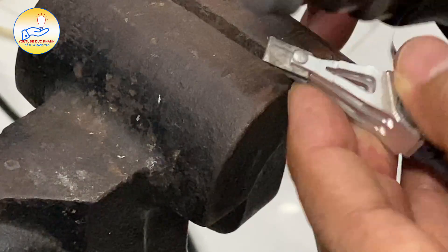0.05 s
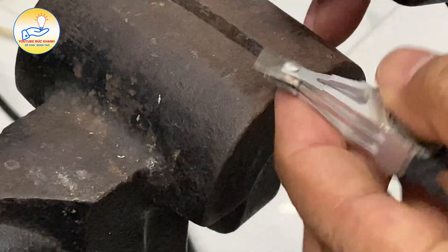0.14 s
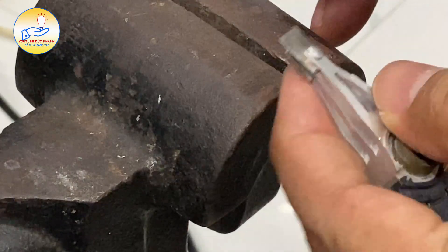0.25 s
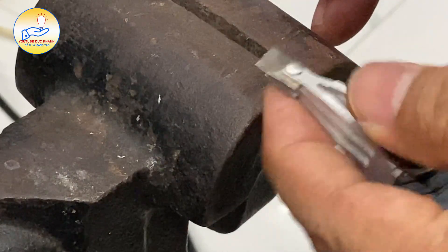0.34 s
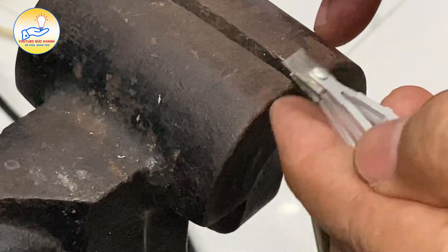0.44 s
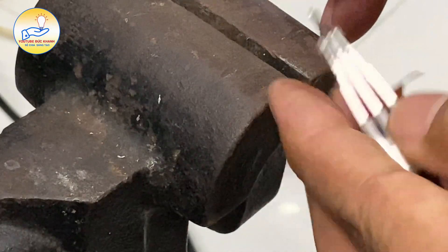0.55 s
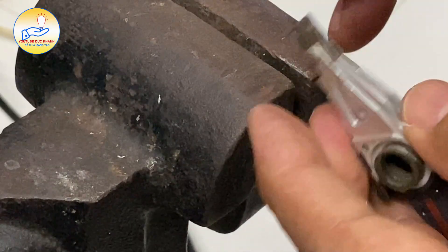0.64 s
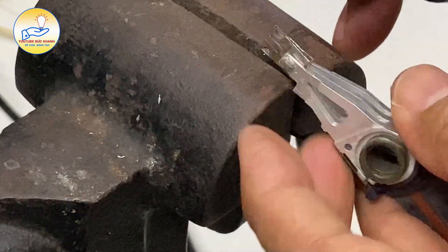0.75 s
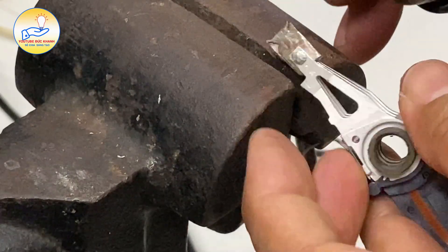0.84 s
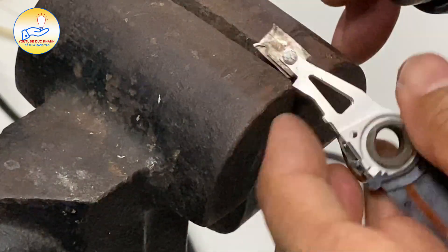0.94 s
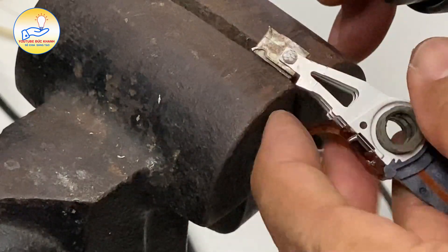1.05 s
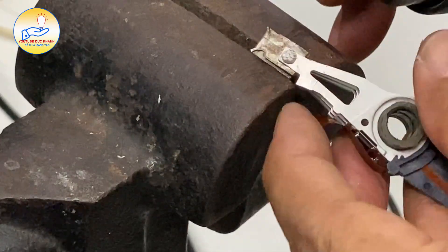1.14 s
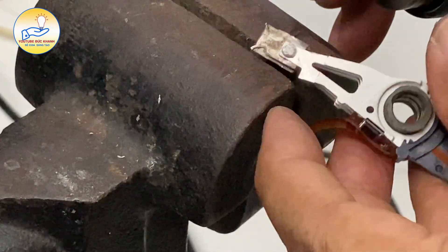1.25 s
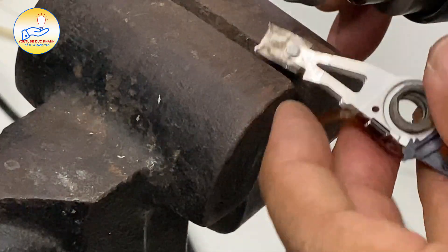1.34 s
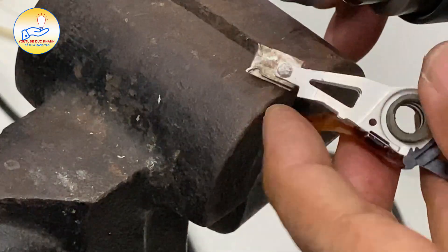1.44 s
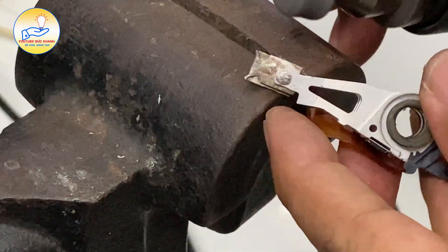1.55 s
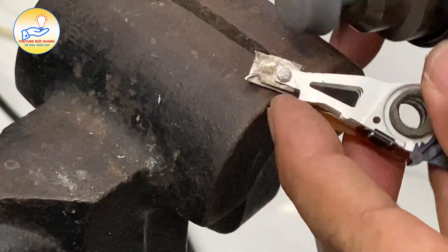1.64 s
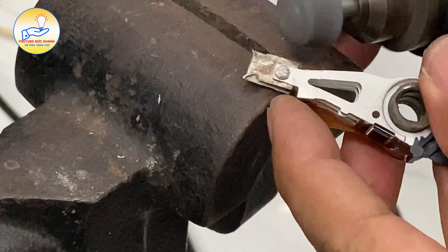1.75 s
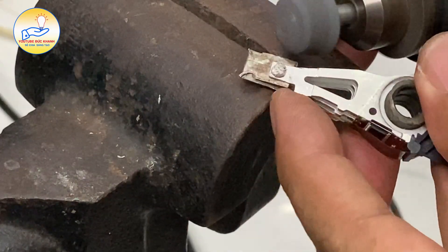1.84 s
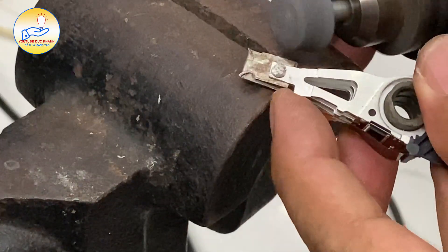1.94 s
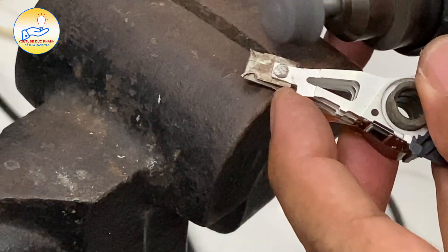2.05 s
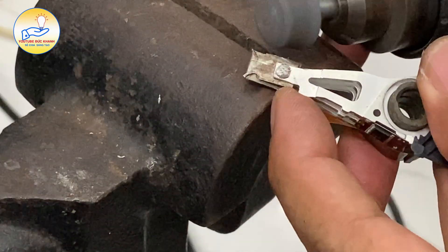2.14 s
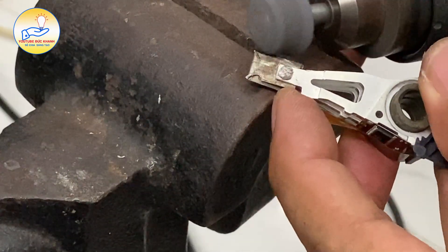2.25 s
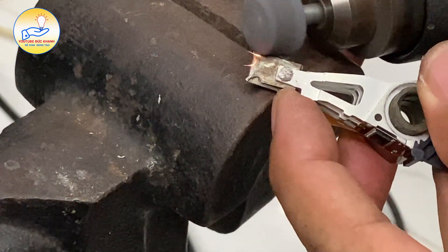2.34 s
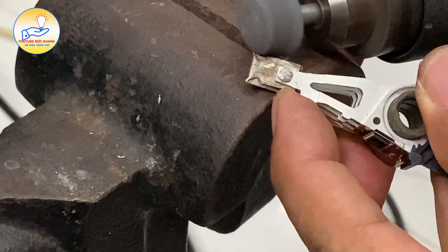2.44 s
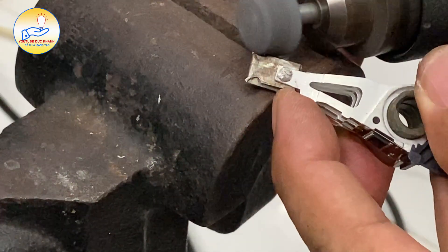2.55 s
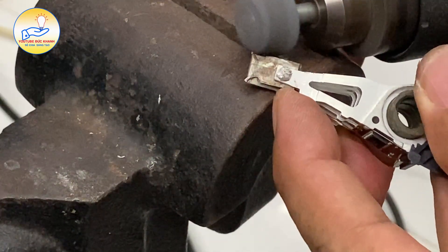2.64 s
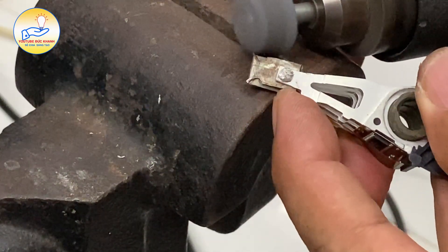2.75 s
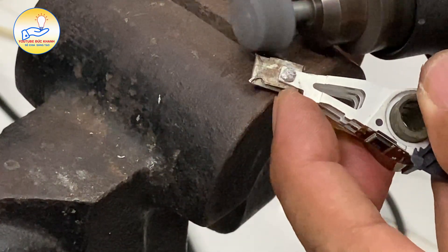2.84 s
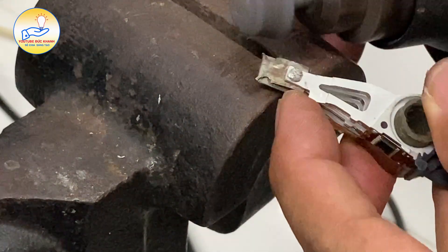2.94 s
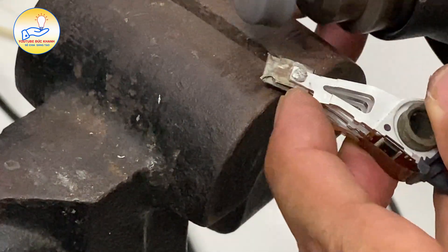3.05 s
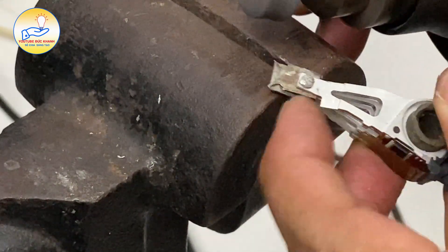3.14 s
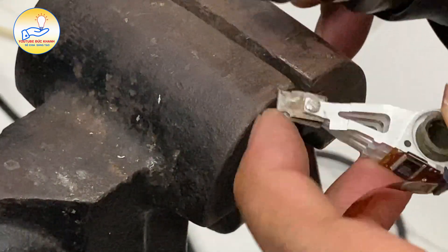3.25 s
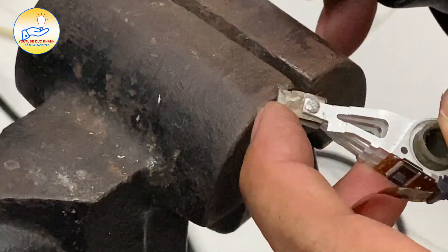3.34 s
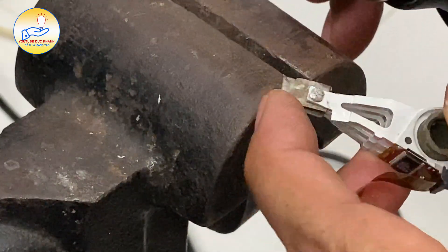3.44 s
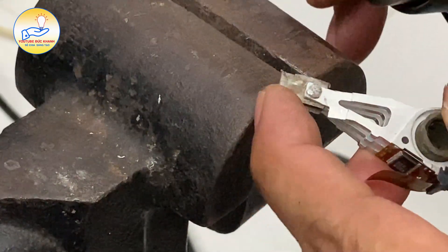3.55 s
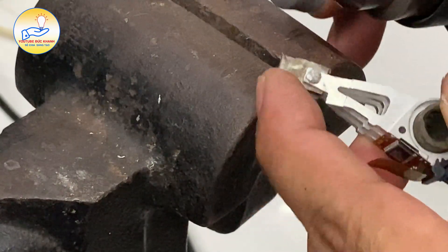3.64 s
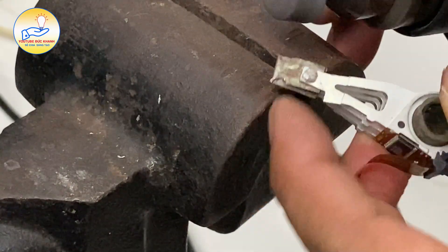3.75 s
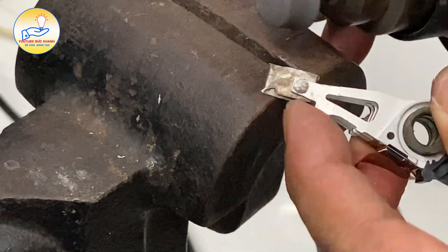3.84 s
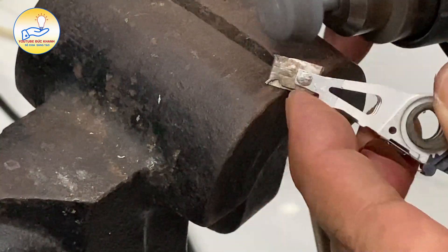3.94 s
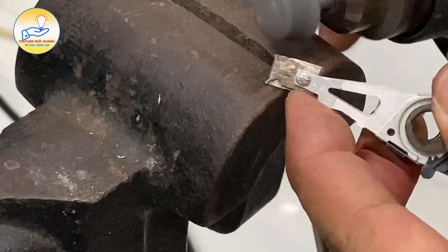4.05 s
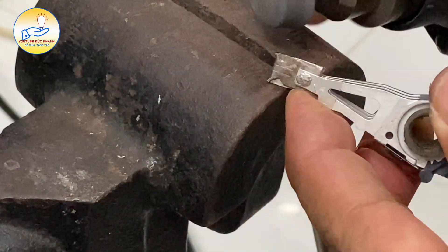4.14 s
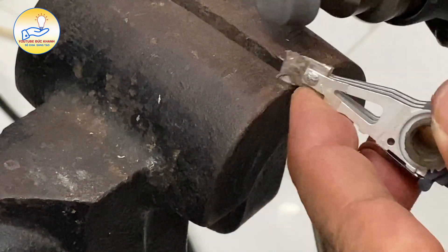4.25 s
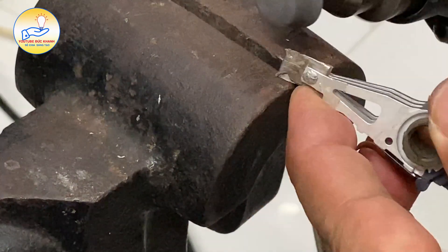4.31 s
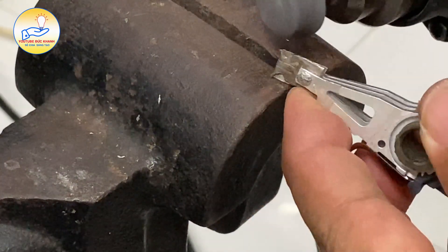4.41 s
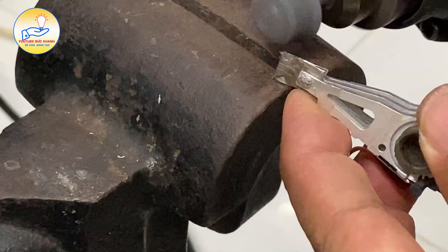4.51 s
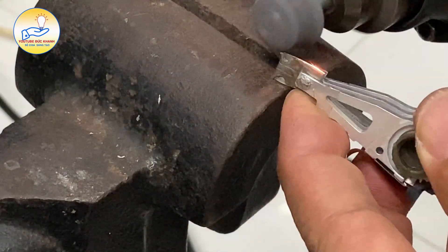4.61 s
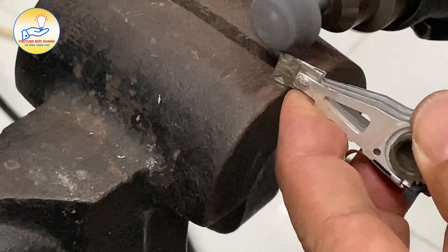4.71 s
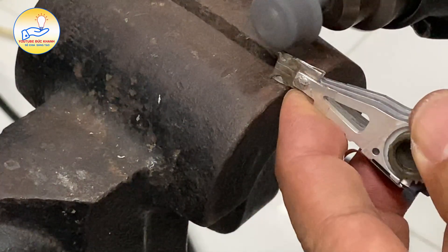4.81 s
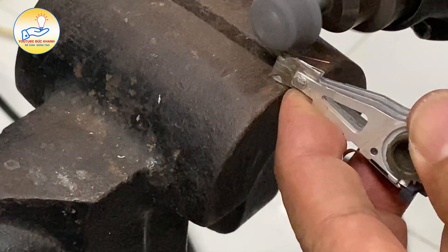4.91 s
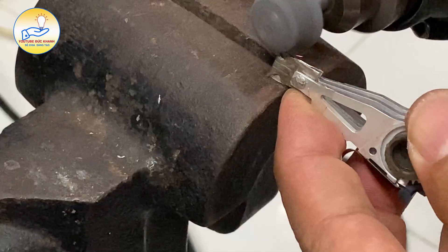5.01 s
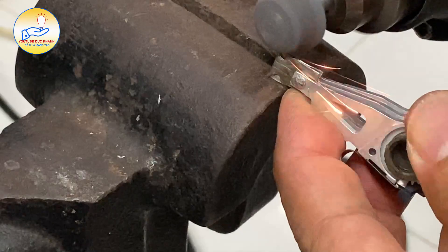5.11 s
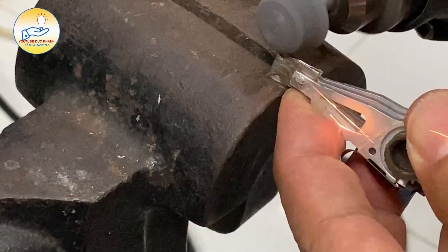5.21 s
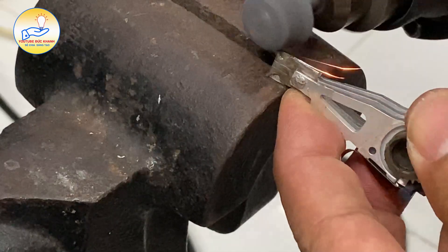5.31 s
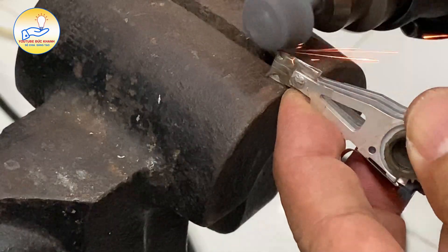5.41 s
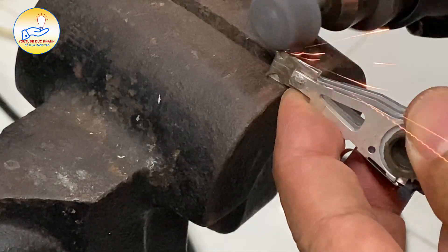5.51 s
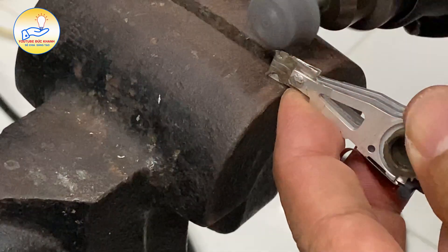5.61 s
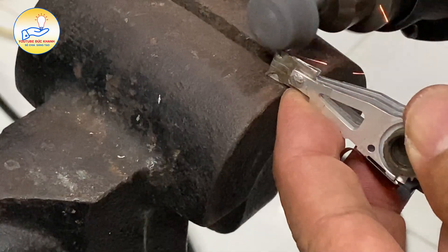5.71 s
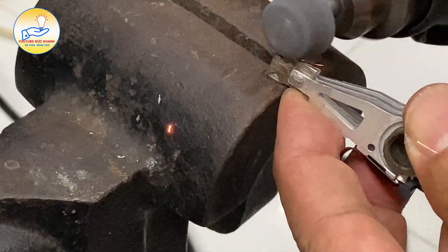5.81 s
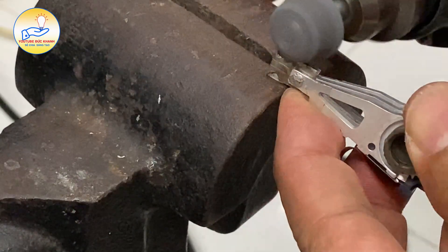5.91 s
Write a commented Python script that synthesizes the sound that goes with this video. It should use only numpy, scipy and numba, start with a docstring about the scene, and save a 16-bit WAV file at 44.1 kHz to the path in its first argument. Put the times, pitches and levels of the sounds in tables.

```python
"""A short rattling touch of metal opens over the whine and rushing air of a small rotary grinder, heard close up.
It spins at about 19000 rpm over a vise; its motor whines with a mains ripple and its fan blows through the vents.
Touch by touch the stone meets a thin steel part: the same grit strikes once a turn, and the part sings or
rattles. Each touch brakes the shaft, which slowly winds up again. Soft thuds come from hands on the vise."""
import sys
import numpy as np
from scipy import signal
from scipy.fft import rfft, irfft
from scipy.io import wavfile
from scipy.ndimage import uniform_filter1d, map_coordinates
from numba import njit

SR = 44100
rng = np.random.default_rng(int(sys.argv[2]) if len(sys.argv) > 2 else 0)


def store_wav(level_fs):
    """Save 16-bit WAV to argv[1]."""
    pcm = np.round(np.clip(np.atleast_2d(level_fs), -1, 1) * 32767)
    wavfile.write(sys.argv[1], SR, pcm.T.astype(np.int16))


N = 263277
TIME = np.arange(N) / SR  # seconds

# base loudness of the grinder as the hand moves it: time_s, level_db [dB]
TOOL_LEVEL = [(0, -38.5), (.3, -39), (.63, -36.5), (2.69, -35), (2.78, -38), (3.5, -37), (4.6, -35.5),
              (5.52, -36), (5.59, -39.5), (5.97, -38)]
# every touch of the stone on the part: start_s, length_s, attack_s, contact (kind of touch, a word),
# ring_db, rasp_db [dB, before the trim of its kind], ring_pitch_hz, braking [Hz per s]
TOUCHES = [(0, 0.022, 0.0018, "loose", -17.5, -25.5, 3620, 11.5),
           (2.25, 0.015, .01, "graze", -21.5, -27.5, 3576, 17),
           (2.333, 0.05, 0.02, "graze", -15.5, -26, 3604, 17.5),
           (2.382, 0.092, 0.073, "edge", -20, -24.5, 3510, 12.6),
           (2.47, 0.093, 0.018, "edge", -24.5, -26.5, 3600, 12.3),
           (2.565, 0.11, 0.032, "edge", -21.5, -25.5, 3660, 19.4),
           (2.679, 0.062, 0.028, "edge", -18.5, -24, 3736, 13.2),
           (2.736, 0.089, 0.023, "edge", -29, -29, 3763, 7.7),
           (4.639, 0.014, 0.0088, "flat", -24.5, -26, 3553, 30),
           (4.693, 0.057, 0.034, "flat", -27.5, -34, 3490, 18),
           (4.911, .014, 0.0089, "flat", -26, -27.5, 3493, 56),
           (4.944, 0.054, .025, "flat", -23, -32, 3500, 14), (5, 0.12, 0.021, "flat", -23, -31, 3480, 14.2),
           (5.121, 0.12, 0.067, "flat", -17, -27, 3483, 25.2),
           (5.25, 0.049, 0.027, "flat", -20.5, -29, 3490, 41),
           (5.299, 0.1, 0.025, "flat", -23, -33, 3424, 15.5),
           (5.388, .11, 0.1, "digging", -22, -31, 3414, 18.8),
           (5.495, 0.046, 0.026, "pressed", -13.5, -33.5, 3700, 95),
           (5.563, 0.017, 0.0099, "pressed", -15, -35, 3700, 60),
           (5.585, 0.031, 0.015, "pressed", -19, -31.5, 3770, 25),
           (5.671, .072, .05, "pressed", -17.5, -31, 3690, 16),
           (5.745, 0.1, 0.061, "pressed", -16, -35.5, 3670, 20),
           (5.84, 0.024, 0.026, "pressed", -14, -27.5, 3610, 62),
           (5.866, 0.038, 0.01, "pressed", -18.5, -31, 3670, 46),
           (5.902, 0.03, 0.017, "pressed", -16.5, -34.5, 3590, 34)]
# how the ring of a touch fades: sag [dB per s] while it lasts, release_s afterwards
RING_SHAPE = (79, 0.024)


def undb(db):
    """Decibels to gain."""
    return 10 ** (np.asarray(db) / 20)


def curves(table):
    """Each column of a table, joined by straight lines in time."""
    seconds, *columns = np.transpose(table)
    return [np.interp(TIME, seconds, column) for column in columns]


def unit(x):
    """Scale to rms (average strength) 1."""
    return x / np.sqrt(np.mean(x ** 2))


def steady(x, size=700):
    """Scale to a running rms of 1 over a window of this many samples."""
    power = np.abs(uniform_filter1d(x ** 2, size))
    return x / np.sqrt(power + 1e-18)


def walk(rate):
    """Smooth random drift with a spread near 1, through this many random points per second."""
    knots = rng.standard_normal(2048)
    coarse_time = TIME[::64]
    drift = map_coordinates(knots, [coarse_time * rate], order=2, mode="mirror")
    return np.interp(TIME, coarse_time, drift)


def colour(x, points, lifts=(), size=2048):
    """Filter without pre-echo, from (Hz, dB) points and resonances (Hz, width Hz, dB of lift or dip)."""
    f = np.arange(size // 2 + 1) * SR / size
    hz, db = np.transpose(points)
    gain_db = np.interp(np.log(f + 1), np.log(hz), db)
    for centre, width, lift in lifts:
        gain_db = gain_db + lift * np.exp(-2 * ((f - centre) / width) ** 2)
    # folding the cepstrum makes the filter answer as early as it can (minimum phase)
    cepstrum = irfft(np.log(undb(gain_db)))[:size // 2]
    cepstrum[1:] *= 2
    response = irfft(np.exp(rfft(cepstrum, size)))
    return signal.fftconvolve(x, response)[:N]


@njit
def resonate(x, hz, width):
    """Band-pass filter with a moving centre, gain 1 at its peak."""
    y, band, low = np.empty(len(x)), 0., 0.
    for i in range(len(x)):
        g = np.tan(np.pi * hz[i] / SR)
        damping = width / hz[i]
        v = (band + g * (x[i] - low)) / (1 + g * (g + damping))
        band = 2 * v - band
        low = low + 2 * g * v
        y[i] = damping * v
    return y


def mode(x, hz, width):
    """One way the part rings: the band-pass used twice for steep sides, then held at rms 1."""
    centre = hz * np.ones(N)
    once = resonate(x, centre, 1. * width)
    return steady(resonate(once, centre, 1. * width))


def clicks(times, sizes, order=4):
    """Clicks placed between the samples, on a grid this many times finer."""
    places = np.rint(np.clip(times, 0, TIME[-1]) * SR * order).astype(int)
    fine = np.bincount(places.ravel(), sizes.ravel(), N * order)
    return signal.resample_poly(fine, 1, order)


def envelope(start, length, attack, sag_db, release, damping=1):
    """Rounded attack, sagging hold and release of one touch; more damping shortens the release."""
    age = TIME - start
    rise = np.sin(np.pi / 2 * np.clip(age / attack, 0, 1))
    sag = undb(-sag_db * np.clip(age, 0, length))
    fall = np.exp(-np.maximum(age - length, 0) * damping / release)
    return rise * sag * fall


def bumps(low_hz=55, high_hz=100):
    """Hands bump the vise softly: dull thuds through the bench, made of swells of low noise."""
    # the thuds: centre_s, level_db [dB], length_s
    thuds = [(1.899, -40.5, 0.035), (2.011, -49, 0.036), (2.3, -52, 0.046), (2.46, -49, 0.013),
             (5.157, -51, 0.04)]
    band = signal.butter(2, (low_hz, high_hz), "band", fs=SR, output="sos")
    rumble = signal.sosfilt(band, rng.standard_normal(N))
    swells = sum(undb(db) * np.exp(-((TIME - s) / length) ** 2) for s, db, length in thuds)
    return steady(rumble, size=2500) * swells


def fan(turns, air_db=4.5, flutter=0.078):
    """Air rushes through the housing as coloured noise, pulsing a little with each turn."""
    # tone of the rushing air: pitch_hz, level_db [dB, relative]
    air_colour = [(20, -60), (40, -21), (65, -22.5), (300, -18.5), (500, -20), (800, -15), (2000, -10),
                  (2800, -11), (4400, -10.5), (5800, -13), (8000, -15), (12000, -16.5), (14000, -17.5),
                  (15500, -23)]
    # resonances of the housing: pitch_hz, width_hz, lift_db [dB, a dip if negative]
    housing = [(628, 34, 6), (966, 161, 13), (1504, 440, 9), (3910, 850, 4.5), (2690, 94, -3.5)]
    pulse = 1 + flutter * np.cos(2 * np.pi * turns)
    rush = rng.standard_normal(N) * pulse * undb(.5 * walk(22.02))
    return unit(colour(rush, air_colour, housing)) * undb(curves(TOOL_LEVEL)[0] + air_db)


# the shaft speeds up from the start towards its free speed, and recovers at the same rate after each touch
START_HZ, FREE_HZ, RECOVERY_S = 299.2, 322.32, 1.16


def shaft_speed():
    """Shaft turns per second: each touch brakes it and the motor pulls it back towards its free speed."""
    braking = 0
    for start, length, *_, brake in TOUCHES:
        # 1 during the touch, 0 outside
        touching = np.clip(np.minimum(TIME - start, start + length - TIME) * SR, 0, 1)
        braking = braking + brake * touching
    lost_hz = signal.lfilter([1 / SR], [1, -np.exp(-1 / (RECOVERY_S * SR))], braking)
    run_up_hz = FREE_HZ - (FREE_HZ - START_HZ) * np.exp(-TIME / RECOVERY_S)
    return run_up_hz - lost_hz


def motor(turns, speed_hz, ripple=0.42, second_ripple=0.23, sway=0.43, second_sway=0.37,
          wobble_db=-14.0, overtone_waver_db=1.0, count=12):
    """The armature slots whine and throb with the rectified mains, over a comb of shaft overtones."""
    # the whine beams, so it changes as the tool turns: time_s, level_db [dB over the tool level],
    # sway_lag [rad, pitch sway against throb], top_lift_db [dB, for its top overtones]
    whine_course = [(0, 8, -.4, 5), (.35, 9, 0, -1), (.7, 7.5, 0.98, 1), (1.2, 8.5, .85, 6),
                    (1.65, 8, .55, -1), (2.15, 9, -0.38, 0), (3.15, 10.5, .2, 2), (3.5, 5.5, .75, -2),
                    (4, 8, 0.24, 1), (4.45, 7.5, -.9, -7), (5.97, 6.5, 0.03, 0)]
    # shaft overtones: order [multiple of the speed], level_db [dB, relative]
    shaft_orders = [(1, -19.5), (3, -16.5), (5, -25), (9, -22), (15, -16.5), (16, -13.5), (20, -16),
                    (22, -24), (24, -17), (27, -25), (28, -14.5), (29, -15.5), (30, -27), (32, -20),
                    (34, -25), (35, -20), (36, -13), (37, -17.5), (40, -31), (42, -24), (46, -31),
                    (48, -19)]
    # the motor case rings when an overtone sweeps through it: pitch_hz, width_hz, lift_db [dB]
    case_resonances = [(4875, 55, 5.5), (7710, 360, 9.5), (13000, 35, 7)]
    tool_db = curves(TOOL_LEVEL)[0]
    whine_db, sway_lag, top_db = curves(whine_course)
    # 7.5 dB over the tool level at free speed, weaker by 0.2 dB for each Hz the shaft has slowed
    overtone_db = tool_db + 7.5 - 0.2 * (FREE_HZ - speed_hz)

    mains = 2 * np.pi * 100 * TIME  # rectified mains pulses at 100 Hz
    throb = 1 + ripple * np.cos(mains) + second_ripple * np.cos(2 * mains)
    angle = 2 * np.pi * turns
    # the pulsing torque also sways the pitch
    lead = sway * np.cos(mains + sway_lag) - second_sway * np.cos(2 * mains - 0.25)
    # the rotor's wobble adds a line one order below the slots
    wobble = undb(wobble_db) * np.sin((count - 1) * angle)
    slots = np.sin(count * angle + lead) + wobble

    overtones = 0
    for multiple, db in shaft_orders:
        order = np.rint(multiple)
        drift = rng.uniform(0, 2 * np.pi) + 0.04 * walk(24)
        lift_db = sum(lift / (1 + ((order * speed_hz - hz) / width) ** 4)
                      for hz, width, lift in case_resonances)
        # short waves fade in and out as the hand moves; the slots' top overtones beam with the whine
        fade_db = overtone_waver_db * min(order / 20, 1) * walk(2.65)
        if order % count == 0 and order > 2 * count:
            fade_db = top_db
        overtones = overtones + undb(db + lift_db + fade_db) * np.sin(order * angle + drift)
    return undb(tool_db + whine_db) * throb * slots + undb(overtone_db) * overtones


def rattle():
    """The part bounces off the stone and rings freely; noise plays the irregular bounces."""
    # the bounces: start_s, length_s, attack_s, level_db [dB]
    bounce_times = [(.008, .014, .01, -25), (4.638, .018, 0.011, -27), (4.913, 0.019, .015, -19),
                    (5.108, 0.087, 0.027, -22), (5.622, .014, .005, -26.5)]
    # how the free part rings: pitch_hz, width_hz, level_db [dB, relative]
    free_modes = [(2150, 230, -15.5), (3649, 150, -1.5), (4260, 240, -10.5)]
    bounces = rng.standard_normal(N)
    ring = sum(undb(db) * mode(bounces, hz, width) for hz, width, db in free_modes)
    level = sum(undb(db) * envelope(start, length, attack, *RING_SHAPE)
                for start, length, attack, db in bounce_times)
    return ring * level


def knocks(turns, scatter_db=1.0, jitter_s=3e-6):
    """The stone runs slightly out of true and knocks the part once a turn."""
    times = np.interp(np.arange(int(turns[-1])), turns, TIME)
    timing, strength = rng.standard_normal((len(times), 2)).T
    return clicks(times + jitter_s * timing, undb(scatter_db * strength))


def grit(turns, arc=0.1577, wear_turns=13, fresh=0.13, jitter_s=1e-6, count=40):
    """Grains on the stone's high side strike again on every turn, their bite changing as they wear."""
    turn = np.arange(2000)[:, None]
    place = arc * rng.standard_normal(count)  # where each grain sits, in turns
    wear, surprise, timing = rng.standard_normal((3, len(turn), count))
    keep = np.exp(-1 / wear_turns)
    slow_wear = signal.filtfilt([1 - keep], [1, -keep], wear, axis=0, padtype="even")
    strength = unit(slow_wear) + fresh * surprise
    times = np.interp(turn + place, turns, TIME)
    inside = (times > 0) & (times < TIME[-1])
    return clicks(times + jitter_s * timing, strength * inside)


def bite(turns, scrape, grit_share=0.45):
    """The stone digs in: a harsh, even screech of knocks and grit swells to a peak and breaks off."""
    # tone of the screech: pitch_hz, level_db [dB, relative]
    screech_colour = [(300, -39), (3000, -14.5), (4000, 0), (5200, -5), (6600, -13), (8500, -27)]
    peak_s, peak_db = 5.528, -19.5
    rise_db_per_s, fall_db_per_s = 123, 330
    knock = unit(knocks(turns, scatter_db=1.0, jitter_s=2e-6))
    screech = steady(colour(knock + grit_share * scrape, screech_colour))
    age = TIME - peak_s
    return screech * undb(peak_db + np.minimum(rise_db_per_s * age, -fall_db_per_s * age))


def stroke(contact, rasp_colour, side_modes, knock, scrape, ring_width, grit_share, ring_db, rasp_db,
           chatter_db=1.4, flutter_db=0.76, damping=1):
    """All touches of one kind: knocks and grit ring the part, and the grit rasps in uneven bursts."""
    # how the rasp of a touch fades: sag [dB per s] while it lasts, release_s afterwards
    rasp_shape = (7.1, 0.025)
    ring_level = rasp_level = pitch_sum = weight = 0
    for start, length, attack, kind, touch_ring_db, touch_rasp_db, hz, _ in TOUCHES:
        if kind == contact:
            ringing = envelope(start, length, attack, *RING_SHAPE, damping) + 1e-12
            rasping = envelope(start, length, attack, *rasp_shape, damping)
            ring_level = np.maximum(ring_level, undb(touch_ring_db) * ringing)
            rasp_level = np.maximum(rasp_level, undb(touch_rasp_db) * rasping)
            pitch_sum = pitch_sum + hz * ringing
            weight = weight + ringing
    drive = knock + grit_share * scrape
    # the pitch glides between touches, weighted by how strongly each one rings
    ring = mode(drive, pitch_sum / weight, ring_width)
    for hz, width, db in side_modes:
        ring = ring + undb(db) * mode(drive, hz, width)
    rasp = steady(colour(scrape, rasp_colour)) * undb(chatter_db * walk(70))
    ring_gain = undb(ring_db + flutter_db * walk(45))
    return ring * ring_level * ring_gain + rasp * rasp_level * undb(rasp_db)


def grinding(turns, knock, scrape):
    """Six kinds of touch work the part, sharing three rasp colours; all but the flat ones add side tones."""
    # tone of the rasp on the part's edge or grazing, lying flat, and pressed hard, digging in or loose:
    # pitch_hz, level_db [dB, relative]
    edge_rasp = [(700, -40), (2400, -9), (3300, -2.5), (4200, 3), (5500, -4), (6700, -5.5), (7600, 0),
                 (8300, -6.5), (9050, 3), (9700, -2.5), (11000, -6), (12900, 0.5), (14300, -2.5),
                 (15600, -13)]
    light_rasp = [(700, -8.5), (2200, 5), (2600, 0), (4200, 11.5), (6000, 1), (6900, 2.5), (9500, -6.5),
                  (11200, 3.5), (12200, 7), (13500, 2), (15600, -11)]
    hard_rasp = [(300, -25), (700, -6), (1500, 7.5), (2950, 0), (4200, 14.5), (5800, 3.5), (7400, 9),
                 (8600, 7), (10000, 3.5), (12400, 3), (15600, 1.5)]
    # side tones of the part for every kind of touch but the flat one:
    # pitch_hz, width_hz, level_db [dB to the main ring]
    loose_modes = [(2140, 130, -12.5)]
    graze_modes = [(2860, 120, -15.5)]
    edge_modes = [(2860, 120, -17), (4090, 320, -3.5), (5150, 330, -20), (6100, 100, -9)]
    digging_modes = [(4160, 200, -1), (5460, 283, -3), (7550, 122, -14)]
    pressed_modes = [(2154, 83, -19.5), (4210, 110, -12), (5190, 150, -20)]
    # on a sharp edge the grains break away faster, so the rasp is more ragged
    ragged = unit(grit(turns, arc=0.1806, wear_turns=5.8, fresh=0.1, jitter_s=1e-6))
    total = stroke("loose", hard_rasp, loose_modes, knock, scrape, ring_width=250, grit_share=0.24,
                   ring_db=1.0, rasp_db=1, damping=3.1)
    total += stroke("graze", edge_rasp, graze_modes, knock, ragged, ring_width=100, grit_share=0.24,
                    ring_db=-2, rasp_db=3.5)
    total += stroke("edge", edge_rasp, edge_modes, knock, ragged, ring_width=79, grit_share=0.4,
                    ring_db=-2.5, rasp_db=3, chatter_db=1.65, flutter_db=1.5)
    total += stroke("flat", light_rasp, [], knock, scrape, ring_width=200, grit_share=0.37,
                    ring_db=1.1, rasp_db=0.5)
    total += stroke("digging", hard_rasp, digging_modes, knock, scrape, ring_width=130, grit_share=0.25,
                    ring_db=-0.5, rasp_db=2.5)
    total += stroke("pressed", hard_rasp, pressed_modes, knock, scrape, ring_width=260, grit_share=0.13,
                    ring_db=-1, rasp_db=3, damping=1.43)
    return total


def scene():
    """One shaft drives the whine, the fan and the grinding."""
    speed_hz = shaft_speed()
    turns = np.cumsum(speed_hz) / SR
    knock = unit(knocks(turns))
    scrape = unit(grit(turns))
    machine = fan(turns) + motor(turns, speed_hz)
    contact = rattle() + bite(turns, scrape) + grinding(turns, knock, scrape)
    return (bumps() + machine + contact)[None]


def record(dry, ceiling=0.88, bass_hz=45, top_hz=15850):
    """Round the tallest peaks, drop the deepest bass and cut the top."""
    rounded = dry / (1 + (dry / ceiling) ** 6) ** (1 / 6)
    thinned = signal.sosfilt(signal.butter(4, bass_hz, "high", fs=SR, output="sos"), rounded)
    return signal.sosfilt(signal.ellip(10, .2, 80, top_hz, fs=SR, output="sos"), thinned)


dry = scene()
out = record(dry)
store_wav(out)
```